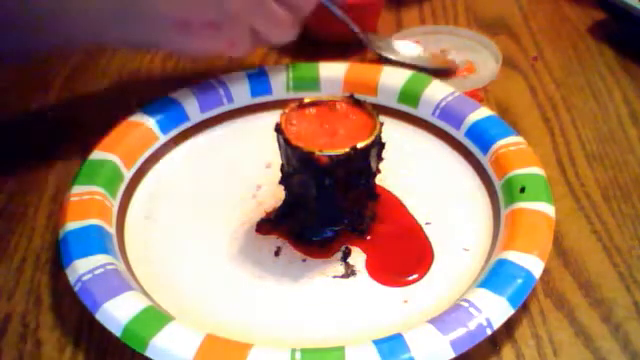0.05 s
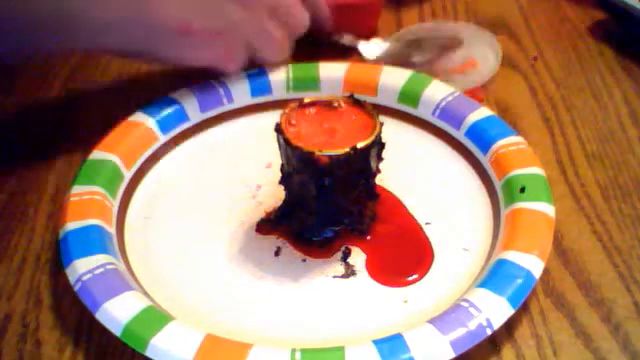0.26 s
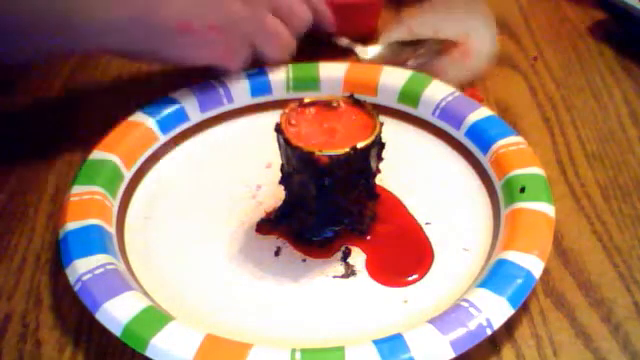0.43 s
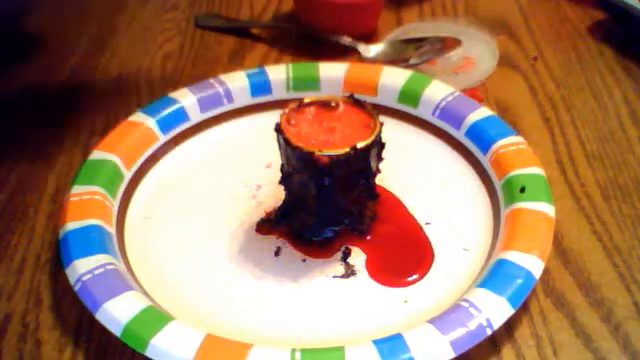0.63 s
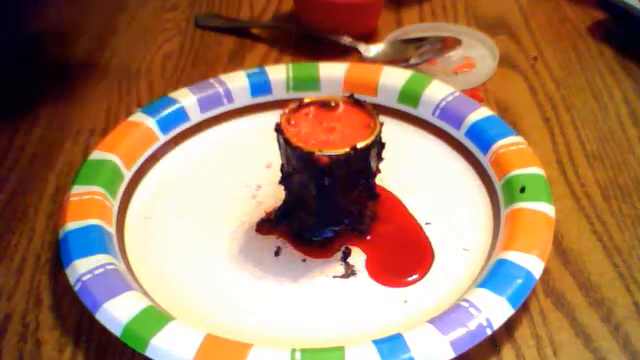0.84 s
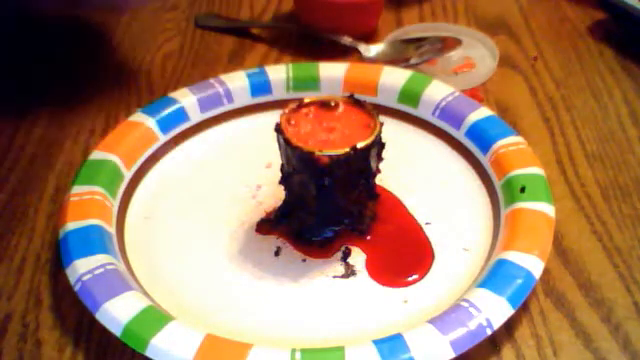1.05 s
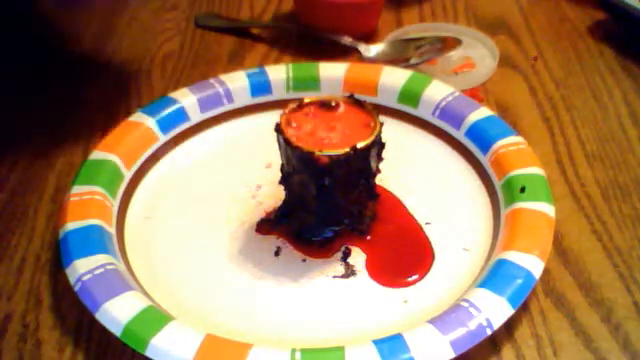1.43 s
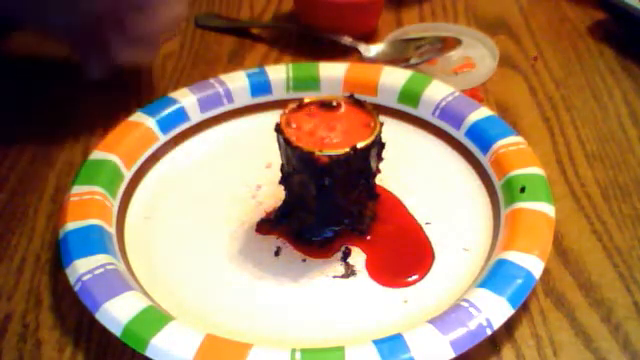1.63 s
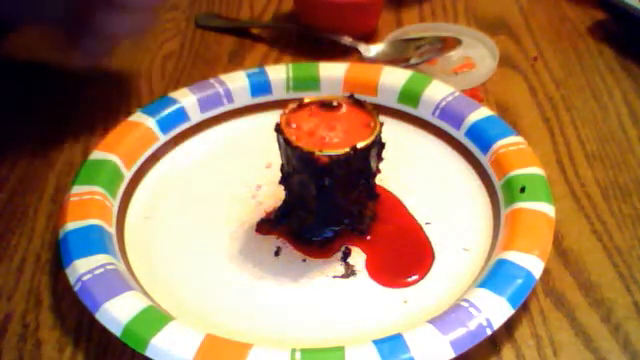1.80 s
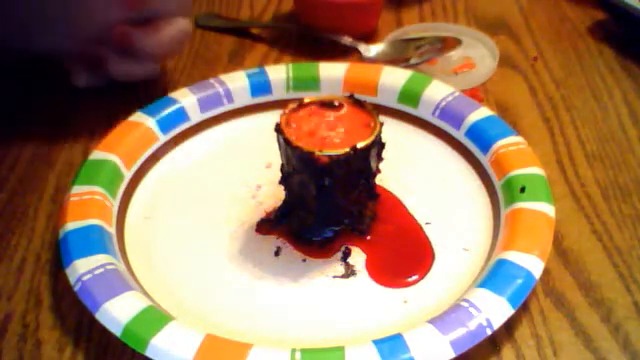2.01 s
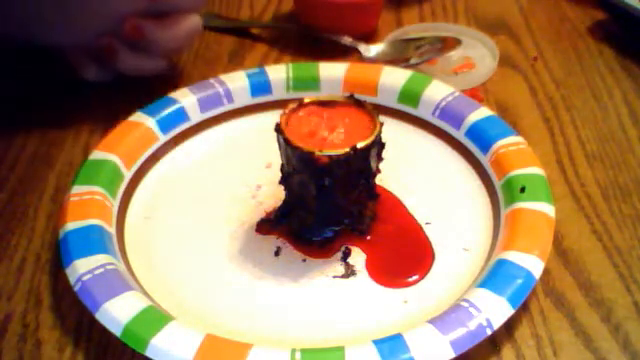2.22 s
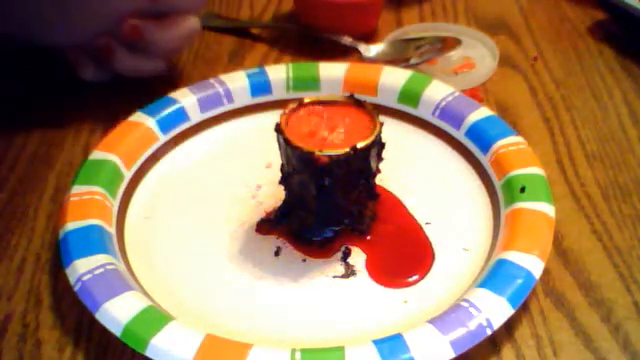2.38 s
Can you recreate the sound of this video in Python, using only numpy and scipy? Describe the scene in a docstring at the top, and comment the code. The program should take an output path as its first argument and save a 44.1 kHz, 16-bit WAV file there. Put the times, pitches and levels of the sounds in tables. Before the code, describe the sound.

A metal spoon drops onto a plastic lid on a wooden table with a loud, ringing clatter. The lid rocks and settles, then soft knocks and faint sleeve rustles follow. The microphone is close, with steady room hiss.

```python
"""Spoon dropped on a plastic lid

A metal spoon clatters on a plastic lid on a wooden table. Each impact excites the free vibration
of spoon and lid; the lid rocks and the spoon settles. The close, peaky microphone overloads.
Soft knocks and a sleeve follow, over steady hiss and a faint pulsing electrical whine."""
import sys
import numpy as np
from scipy import signal
from scipy.fft import rfft, irfft, next_fast_len
from scipy.io import wavfile
from scipy.ndimage import uniform_filter1d

SR = 44100
rng = np.random.default_rng(int(sys.argv[2]) if len(sys.argv) > 2 else 0)


def materialize(psi):
    """Save the field psi as 16-bit PCM at rate SR to the path in sys.argv[1].

    A 1-D psi becomes a single channel; in a 2-D psi each row is a channel.
    """
    bounded = np.clip(np.atleast_2d(psi).T, -1, 1)
    quanta = np.round(bounded * 32767).astype(np.int16)
    wavfile.write(sys.argv[1], SR, quanta)


N = 112454
T = np.arange(N) / SR


def amp(db):
    return 10 ** (np.asarray(db) / 20)


def lowpass(x, order, hz):
    return signal.sosfilt(signal.butter(order, hz, fs=SR, output="sos"), x)


def fade(t60, start):
    """Damping: exponential decay from the start, 60 dB in t60 seconds."""
    return (T >= start) * np.exp(-np.log(1000) * np.maximum(T - start, 0) / t60)


def swell(t60, start, rise):
    """Damped decay with a rounded attack."""
    return fade(t60, start) * (1 - np.exp(-(np.maximum(T - start, 0) / rise) ** 2))


def noise(spectrum):
    """Spectral shaping: white noise is coloured and scaled to unit rms."""
    hz, db = np.array(spectrum).T
    size = next_fast_len(N)
    f = np.maximum(np.fft.rfftfreq(size, 1 / SR), 1)
    gain = amp(np.interp(np.log(f), np.log(hz), db)) / (1 + (f / hz.max() / 2) ** 2)
    x = irfft(rfft(rng.standard_normal(size)) * gain, size)[:N]
    return x / x.std()


def envelope(hits, t60, rise):
    """Incoherent addition: the decays of successive hits sum in power."""
    return np.sqrt(sum((amp(db) * swell(t60, s, rise)) ** 2 for s, db, *_ in hits))


def bursts(hits, spectrum, t60, rise):
    """Modal overlap: dense resonances merge into decaying noise."""
    return noise(spectrum) * envelope(hits, t60, rise)


def ring(hits, modes, scatter=0.025):
    """Modal superposition: damped sines, in a mix that varies with the point of contact."""
    out, t = np.zeros(N), T[:SR // 2]
    for s, db in hits:
        start = int(s * SR)
        for hz, mode_db, t60 in modes:
            decay = amp(db + mode_db + 2 * rng.standard_normal()) * np.exp(-np.log(1000) * t / t60)
            mode = decay * np.sin(2 * np.pi * hz * (1 + scatter * rng.standard_normal()) * t)
            out[start:start + len(t)] += mode[:N - start]
    return out


def room(x, wet_db):
    """Reverberation: a small room adds a short, slightly dull diffuse tail."""
    tail = lowpass(rng.standard_normal(N), 2, hz=6500) * fade(t60=0.32, start=0.004)
    return x + amp(wet_db) * signal.fftconvolve(x, tail / np.linalg.norm(tail))[:N]


# Each row: frequency in Hz, relative noise density in dB.
HISS_SPECTRUM = [(25, 2), (70, -2.5), (120, -5.5), (220, -8.5), (500, -15), (1050, -20), (1600, -25.5),
                 (2300, -26.5), (3000, -21), (3700, -21), (4300, -8.5), (5000, -18.5), (5700, -23.5),
                 (6800, -29.5), (8100, -29), (9300, -36.5), (10500, -49.5)]
# Each row: time in seconds, gain of the hiss in dB.
HISS_GAIN = [(0, 5), (.2, 4.5), (.75, 0.5), (1.0, 0.5), (1.6, 0.5), (2.1, -1), (2.5, -1)]

def hiss():
    """Broadband noise: room rumble and hiss, peaked by the microphone's resonance."""
    resonance = signal.butter(2, [4002, 4402], "band", fs=SR, output="sos")
    peak = signal.sosfilt(resonance, rng.standard_normal(N))
    knots = np.arange(0, T[-1] + 0.1, 0.07)
    waver_db = 0.5 * np.interp(T, knots, rng.standard_normal(len(knots)))
    gain = amp(waver_db + np.interp(T, *np.array(HISS_GAIN).T))
    return gain * (amp(-51) * noise(HISS_SPECTRUM) + amp(-57) * peak / peak.std())


def whine(hz=7993, first_s=0.057, period_s=0.1232, length_s=0.028):
    """Amplitude modulation: an electrical tone pulses on and off."""
    gate = uniform_filter1d(1. * ((T - first_s) % period_s < length_s), size=160)
    return amp(-57.5) * gate * np.sin(2 * np.pi * hz * T)


# Each row: centre in seconds, Gaussian width in seconds, level in dB.
RUSTLES = [(0.056, 0.0056, -46.5), (0.73, 0.066, -51), (1.31, 0.03, -53), (1.582, 0.026, -52.5),
           (1.713, 0.015, -54), (2.05, 0.021, -50)]
# Each row: frequency in Hz, relative noise density in dB.
RUSTLE_SPECTRUM = [(1500, -16), (3000, -13), (3700, -1), (4350, 5), (5000, -6.5), (6200, -10),
                   (7500, -21.5), (9500, -33)]
SLEEVE_SPECTRUM = [(100, 3), (500, -3), (1000, -0.5), (2200, -5), (3500, -18), (8000, -55)]

def rubbing():
    """Sliding friction: a sleeve and a hand make brief swells of noise."""
    def stroke(s, width, db):
        return amp(db) * np.exp(-0.5 * ((T - s) / width) ** 2)
    sleeve = noise(SLEEVE_SPECTRUM) * stroke(s=2.34, width=0.062, db=-49.5)
    return sleeve + noise(RUSTLE_SPECTRUM) * sum(stroke(*row) for row in RUSTLES)


# Each row: start in seconds, level in dB.
THUDS = [(.034, -47), (.050, -39.5), (.236, -31), (.280, -32), (.636, -35), (1.505, -46), (1.555, -39),
         (2.035, -38), (2.316, -44.5), (2.348, -39.5)]
# Each row: frequency in Hz, relative noise density in dB.
THUD_SPECTRUM = [(30, -27), (70, 23.5), (220, -1), (400, -32), (1200, -88), (4000, -49)]

def thuds():
    """Structure-borne sound: the table carries low thuds."""
    return bursts(THUDS, THUD_SPECTRUM, t60=0.11, rise=0.001)


# Each row: start in seconds, contact level in dB, gain of the wood's ring in dB.
KNOCKS = [(1.554, -35, -13), (1.812, -32.5, -2), (1.987, -51.5, -19)]
# Each row: frequency in Hz, relative noise density in dB.
KNOCK_SPECTRUM = [(40, -14), (150, -0.5), (280, 2.5), (600, -5.5), (1000, -9.5), (1500, -7), (4000, -67)]
# Each row: frequency in Hz, level in dB, 60 dB decay time in seconds.
TABLE_MODES = [(435, -38, 0.15), (682, -34, 0.075), (950, -23, 0.025)]

def knocks():
    """Soft impact: the wooden table's low modes sound briefly."""
    contact = room(bursts(KNOCKS, KNOCK_SPECTRUM, t60=0.087, rise=0.0018), wet_db=-7)
    wood = ring([(s, db) for s, _, db in KNOCKS], TABLE_MODES)
    return lowpass(contact + wood, 6, hz=1110)


# Each row: start in seconds, relative level in dB.
TICKS = [(0.177, -15.5), (0.212, -31.5), (0.222, -13)]
# Each row: frequency in Hz, relative noise density in dB.
TICK_SPECTRUM = [(100, -28), (700, -12), (1050, -2), (1300, -5), (1700, -13.5), (3800, -19), (4400, -2),
                 (5200, -23), (8000, -38)]

def slip(tink_hz=4750, t60=0.02, rise=0.005):
    """Heavily damped vibration: the spoon tinks as it leaves the fingers."""
    tink = sum(amp(db + 8) * swell(t60, s, rise) for s, db in TICKS) * np.sin(2 * np.pi * tink_hz * T)
    return tink + room(amp(1) * bursts(TICKS, TICK_SPECTRUM, t60, rise), wet_db=-4)


# Each row: start in seconds, relative level in dB.
ROCKS = [(0.449, -14), (0.496, -17.5), (0.513, -17.5), (0.537, -22), (0.568, -24), (0.592, -26),
         (0.628, -32), (0.64, -26.5), (.661, -27), (0.677, -32)]
# Each row: frequency in Hz, relative noise density in dB.
ROCK_SPECTRUM = [(30, 1), (90, -2), (200, 5.5), (400, -1), (1050, 1), (1450, -11.5), (2100, -10),
                 (4400, -16), (9000, -34)]

def lid_rocking():
    """Dissipation: the rocking lid taps the table more and more softly."""
    return room(amp(-7) * bursts(ROCKS, ROCK_SPECTRUM, t60=0.059, rise=0.0045), wet_db=-12)


# Each row: start in seconds, spoon gain in dB, contact from bowl (0) to handle (1), lid gain in dB.
BLOWS = [(0.233, -6, 0.65, -0.5), (0.245, 2, 0.13, 0), (.254, -1, 0.08, 0), (0.265, -12.5, 0.3, 0),
         (0.272, 2.5, 0.05, -0.5), (.284, -5, 0.6, 5), (0.29, 3.5, 0.07, 3.5), (0.299, -2, 0, -3),
         (0.31, 1, 0.26, -4.5), (.322, 1, 0.2, -2), (.335, -1.5, 0.97, 1), (.351, -1, 0.94, 3),
         (.359, -23, 1, -5), (0.373, -8, 0.8, -11.5), (.383, -4.5, 0.7, -8), (0.397, -3.5, 0.8, -15),
         (0.415, -13, 0.7, -8.5), (0.425, -28.5, .8, -10.5), (0.451, -27, 0.6, -8.5), (.466, -35, 0.5, -20),
         (0.482, -37, 0.5, -24.5), (0.517, -38, 0.4, -26.5), (0.535, -48.5, 0.1, -24)]
LID_HITS = [(s, db) for s, _, _, db in BLOWS]
# Each row: frequency in Hz, level in dB, 60 dB decay time in seconds.
LID_MODES = [(263.8, -31.5, 0.2), (1030, -22, 0.023), (1597, -32, 0.024), (2035, -23.5, 0.065),
             (2710, -18, 0.031)]
# Each row: frequency in Hz, relative noise density in dB.
CRACK_SPECTRUM = [(30, -9), (100, -26.5), (250, -7.5), (400, -10.5), (600, -13.5), (1000, -5.5),
                  (1400, -10.5), (2100, -11), (3300, -2.5), (3900, -5.5), (4400, 4), (5200, -8),
                  (7000, -14), (8200, -27), (9000, -55)]

def lid_cracks():
    """Impulse excitation: blows crack and ring on lid and table."""
    cracks = amp(-7.5) * bursts(LID_HITS, CRACK_SPECTRUM, t60=0.038, rise=0.00071)
    return room(cracks + ring(LID_HITS, LID_MODES), wet_db=-5.5)


# Each row: frequency in Hz, relative noise density in dB.
TREBLE_SPECTRUM = [(3000, -28.5), (6000, -6.5), (7500, 3.5), (9200, -2.5), (10500, -8)]

def top_treble(ratio=5.4):
    """Downward expansion: as in noise suppression, the highest treble is kept only on loud blows."""
    expanded = [(s, ratio * min(db, 0)) for s, db in LID_HITS]
    return amp(-28) * bursts(expanded, TREBLE_SPECTRUM, t60=0.22, rise=0.0018)


def lid_boom(rest_hz=170, bent_hz=287.3):
    """Nonlinear stiffness: the lid's lowest mode is higher in pitch the harder it is bent."""
    pushes = LID_HITS + [(s, db + 18) for s, db in ROCKS]
    bend = envelope(pushes, t60=0.3495, rise=0.012)
    hz = rest_hz + (bent_hz - rest_hz) * bend / bend.max()
    wander = 0.11 * noise([(1, 1), (30, -1), (80, -30)])
    return amp(-36) * bend * np.sin(2 * np.pi * np.cumsum(hz * (1 + wander)) / SR)


# Each row: frequency in Hz, relative noise density in dB.
CLANK_SPECTRUM = [(2500, -29.5), (3300, -13), (3600, 0), (4150, 1), (4600, -0.5), (5200, -20)]

def clank(db=-7):
    """Transient response: the first landing excites many short-lived resonances of the metal."""
    return bursts([(BLOWS[0][0], db)], CLANK_SPECTRUM, t60=0.15, rise=0.003)


# Each row: frequency in Hz, relative level in dB when struck on the bowl, the same on the handle,
# 60 dB decay time in seconds.
SPOON_MODES = [(2623, -37, -28, .45), (3090, -18, -9, .42), (3177, -27, -20, .48), (3741, -24, -27, .28),
               (4360, -10, -7, .43), (4390, -24, -20, .4), (4448, -19, -29, .22), (4526, -21, -31, .22),
               (5972, -54, -23, .56), (6610, -19, -37, .32)]

def spoon(settle_s=0.575):
    """Free vibration: modes store energy from each blow until lying on the lid damps them."""
    s, db, handle, _ = np.array(BLOWS).T
    at, out = (s * SR).astype(int), 0
    for hz, bowl_db, handle_db, t60 in SPOON_MODES:
        supplied, phase_kicks = np.zeros(N), np.zeros(N)
        supplied[at] = amp(db + bowl_db + handle * (handle_db - bowl_db)) ** 2
        retention = np.exp(-2 * np.log(1000) / (t60 * SR))
        stored = signal.lfilter([1], [1, -retention], supplied)
        phase_kicks[at] = 0.7 * rng.standard_normal(len(at)) * np.sqrt(supplied[at] / stored[at])
        phase = 2 * np.pi * (hz * T + rng.random()) + np.cumsum(phase_kicks)
        out += np.sqrt(stored) * np.sin(phase)
    return amp(-3) * out * np.where(T < settle_s, 1, fade(t60=0.2, start=settle_s))


def scene():
    """Superposition: all sources add in one channel."""
    drop = slip() + clank() + spoon() + lid_cracks() + top_treble() + lid_rocking() + lid_boom()
    return (drop + knocks() + thuds() + rubbing() + hiss() + whine())[None]


def limiter(x, ceiling=0.73, release_s=0.012):
    """Peak limiting: the gain drops at once on overload and recovers quickly."""
    excess = np.log(np.maximum(np.abs(x) / ceiling, 1))
    recovery = T / release_s
    reduction = np.maximum.accumulate(excess + recovery, axis=-1) - recovery
    return x * np.exp(-reduction)


def record(dry):
    """Band limiting: the microphone loses the top octave; the loudest blows hit the limiter."""
    limited = limiter(lowpass(dry, 10, hz=9700))
    return signal.sosfiltfilt(signal.ellip(8, 0.1, 60, 15900, fs=SR, output="sos"), limited)


dry = scene()
out = record(dry)
materialize(out)
```